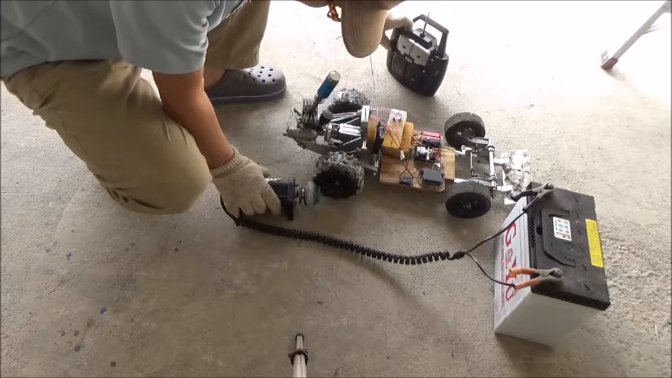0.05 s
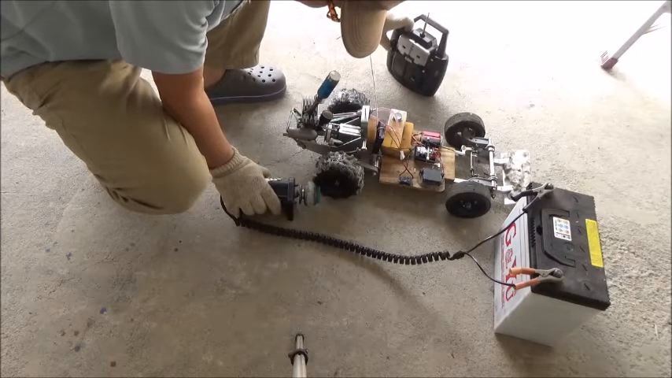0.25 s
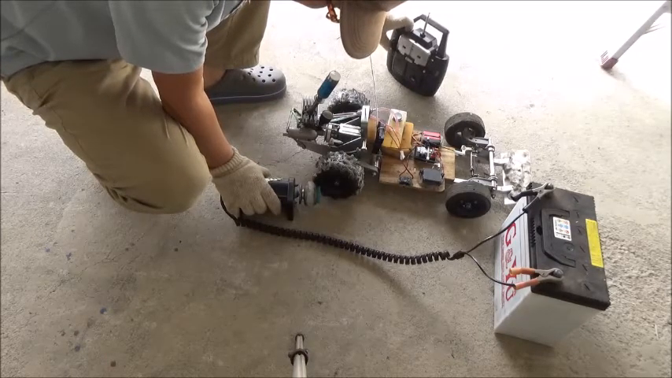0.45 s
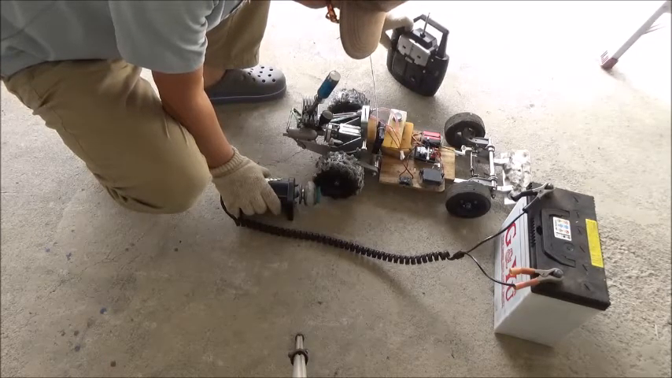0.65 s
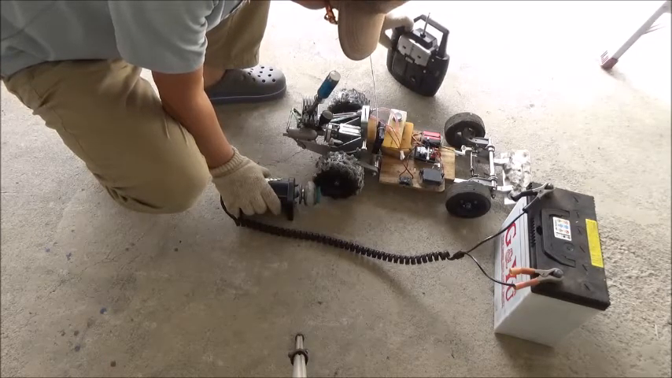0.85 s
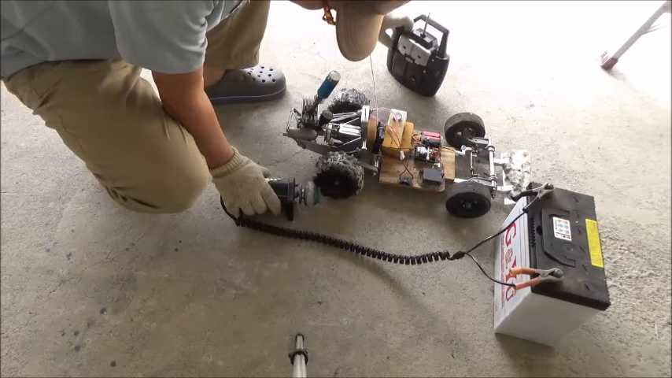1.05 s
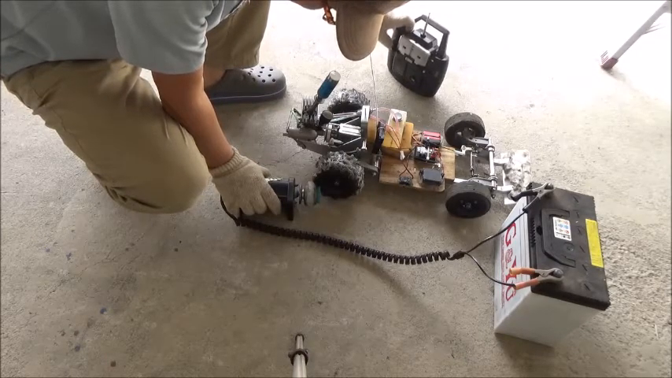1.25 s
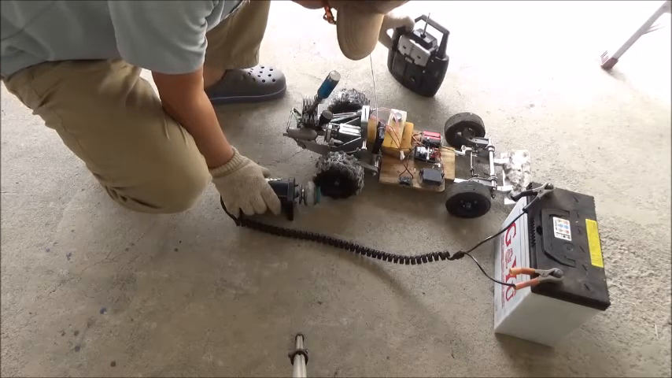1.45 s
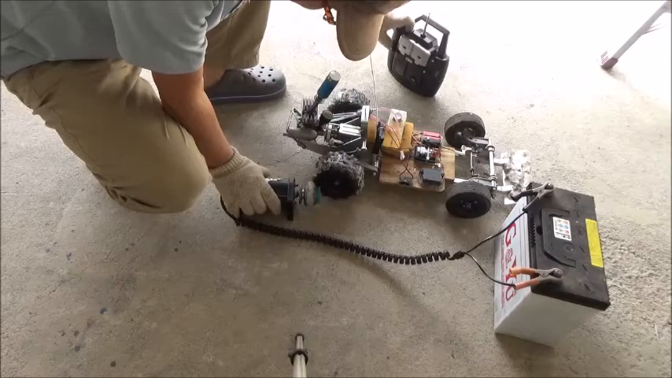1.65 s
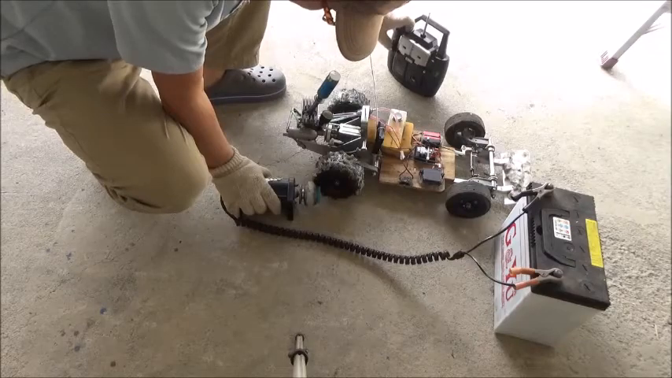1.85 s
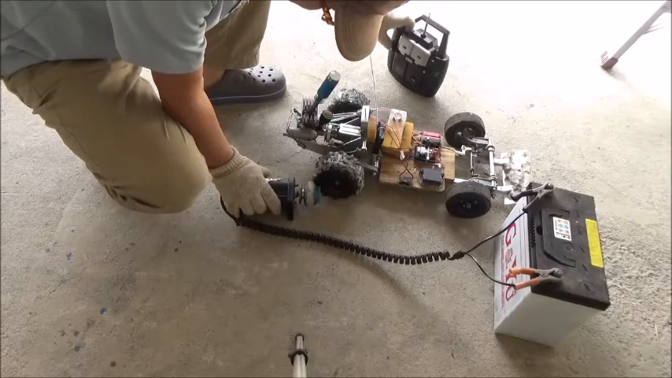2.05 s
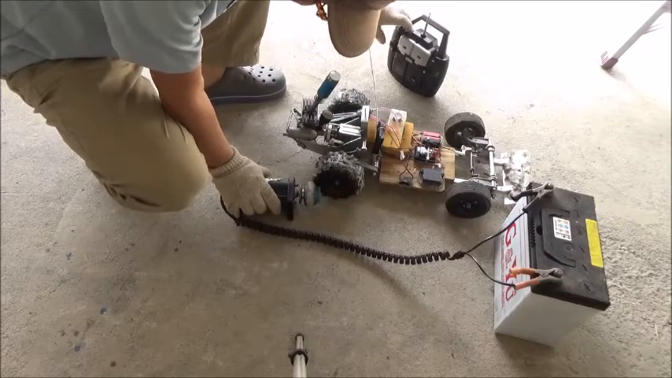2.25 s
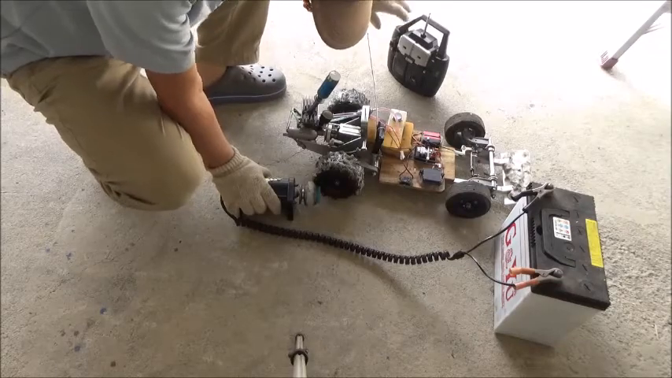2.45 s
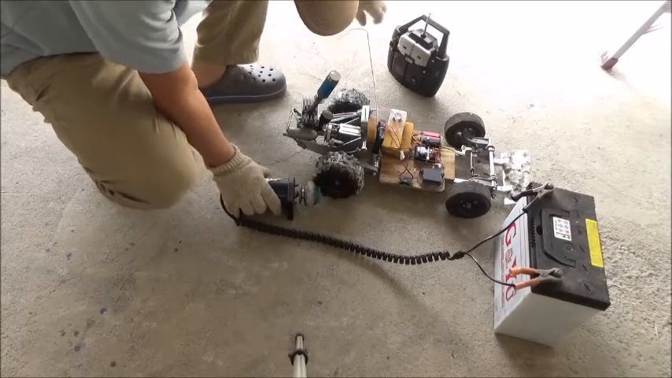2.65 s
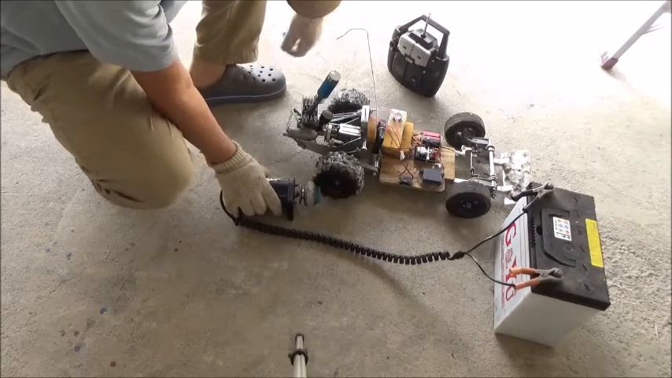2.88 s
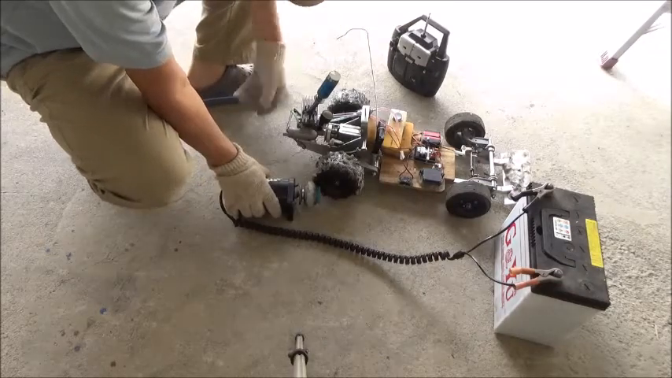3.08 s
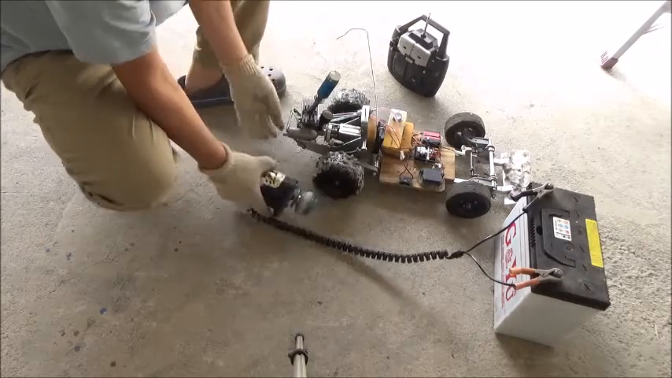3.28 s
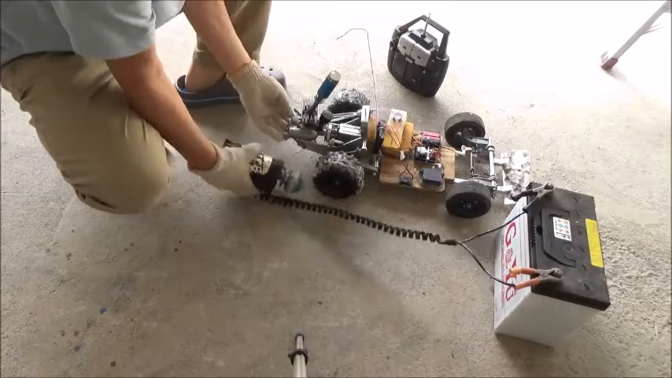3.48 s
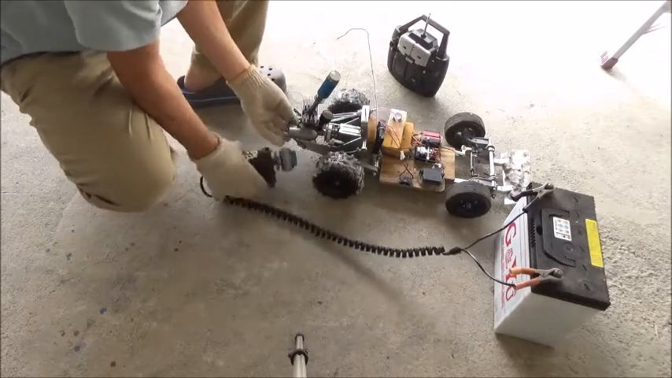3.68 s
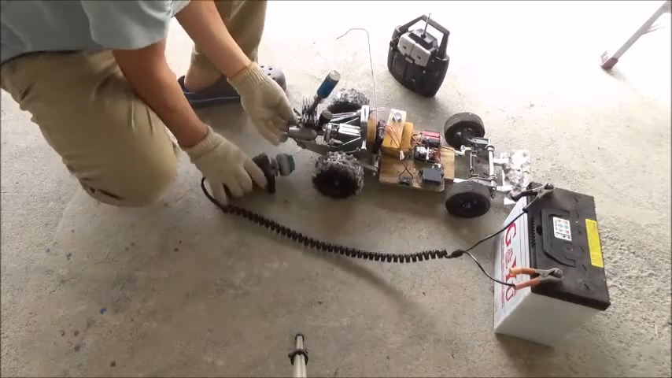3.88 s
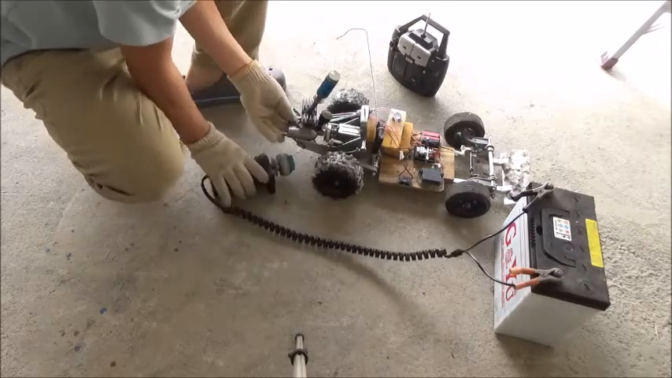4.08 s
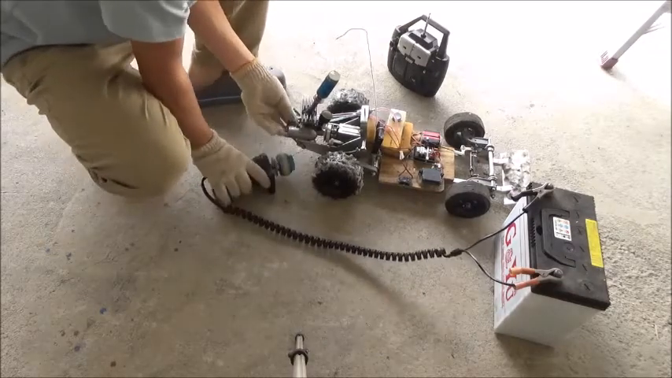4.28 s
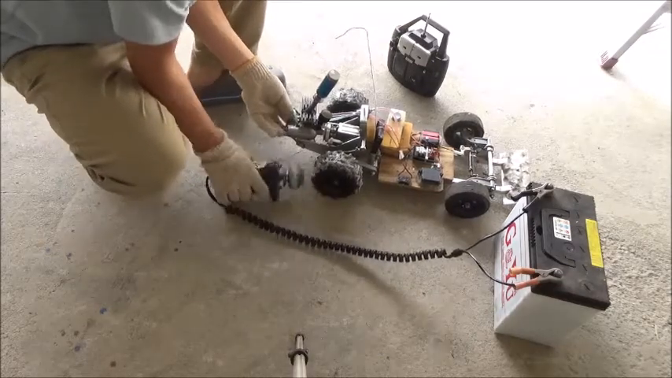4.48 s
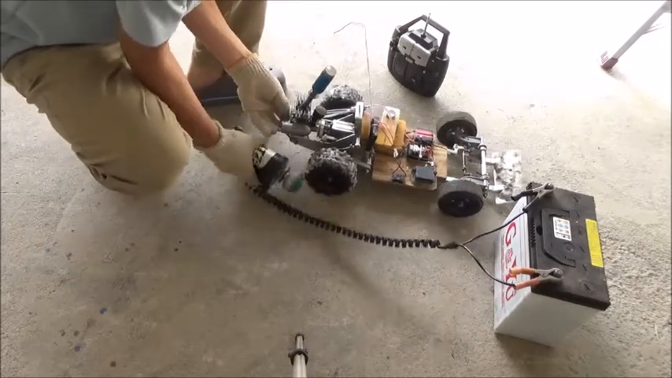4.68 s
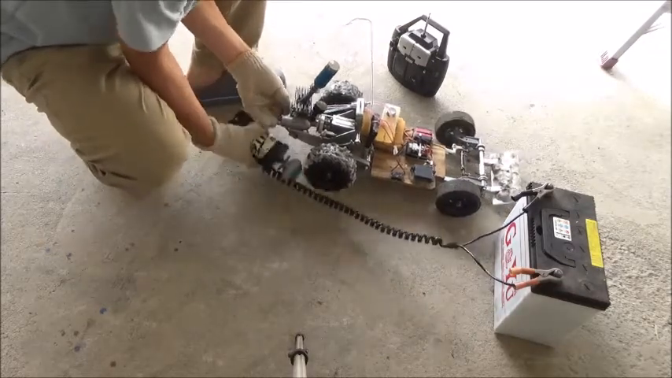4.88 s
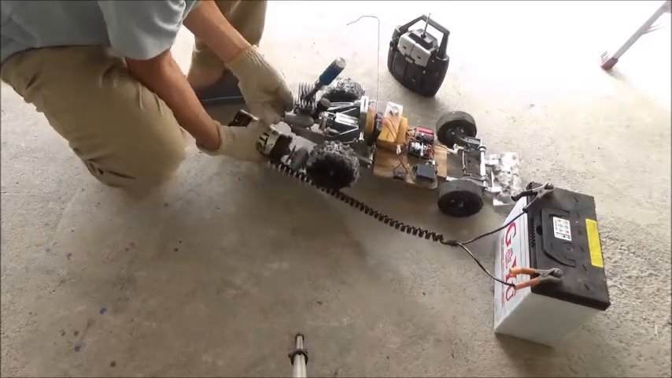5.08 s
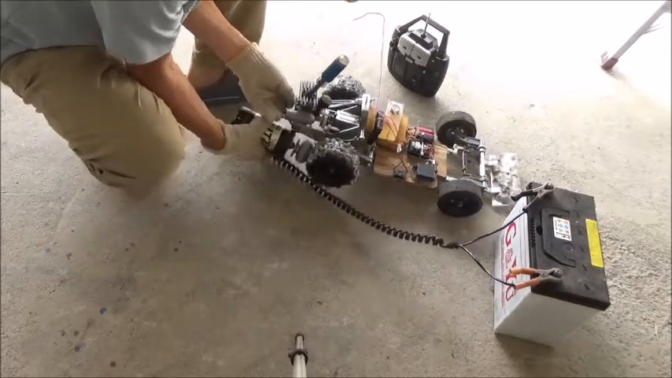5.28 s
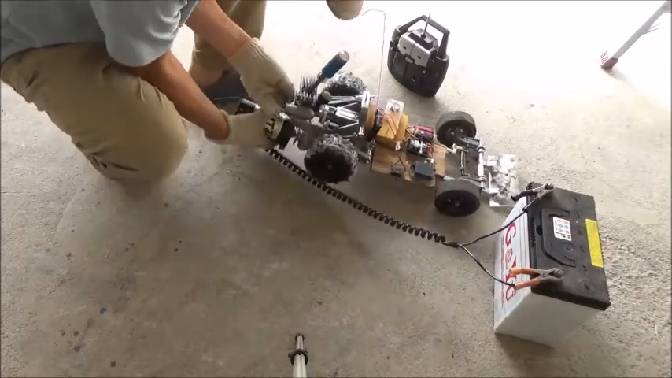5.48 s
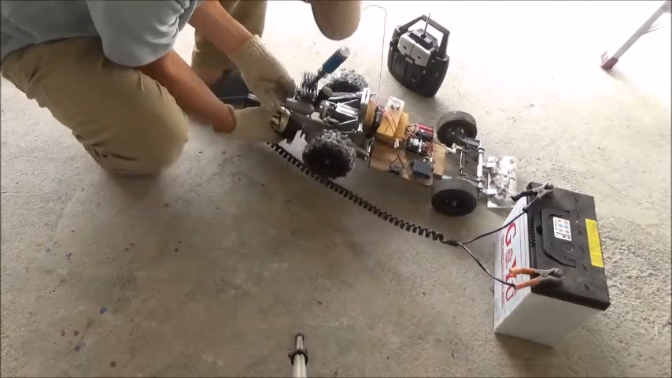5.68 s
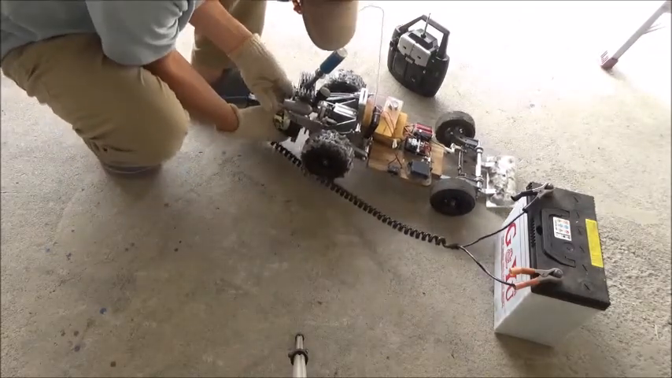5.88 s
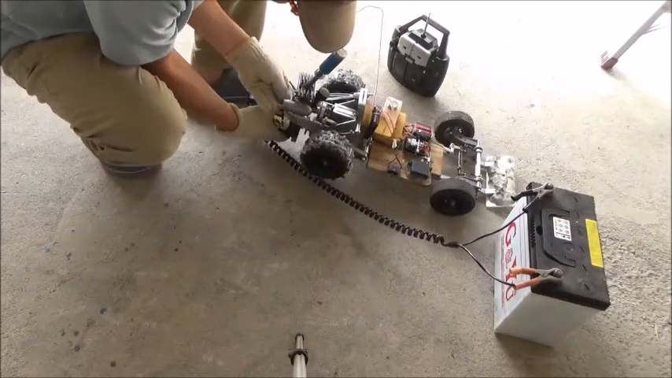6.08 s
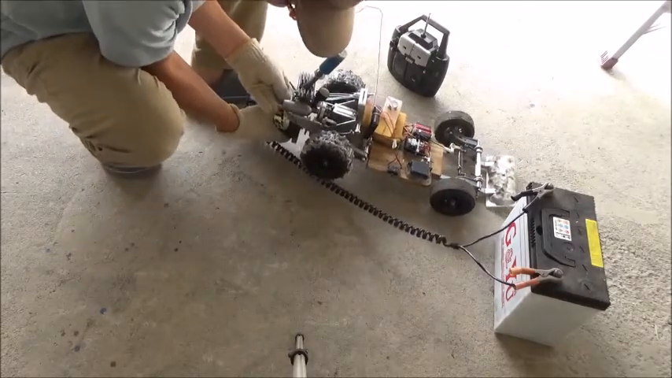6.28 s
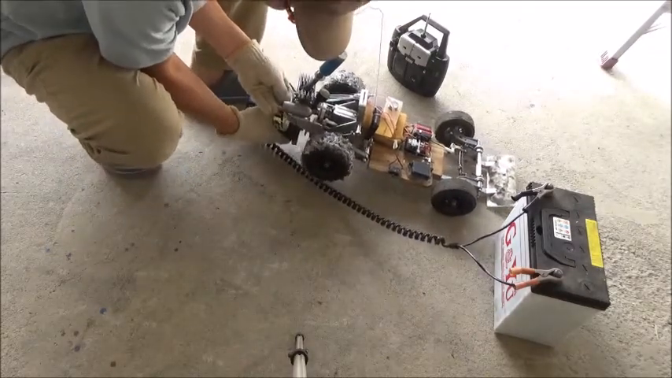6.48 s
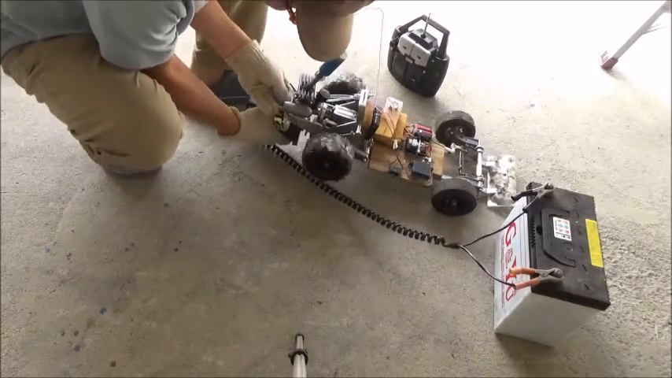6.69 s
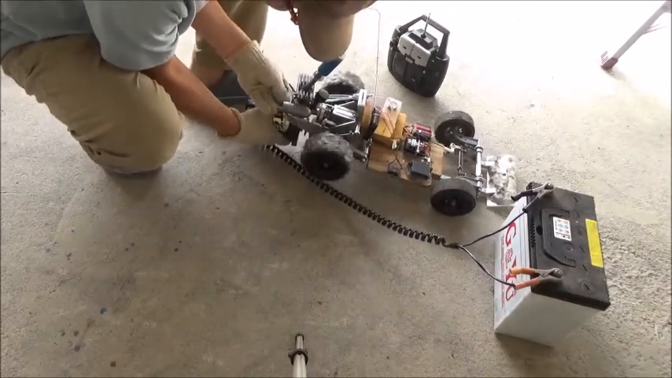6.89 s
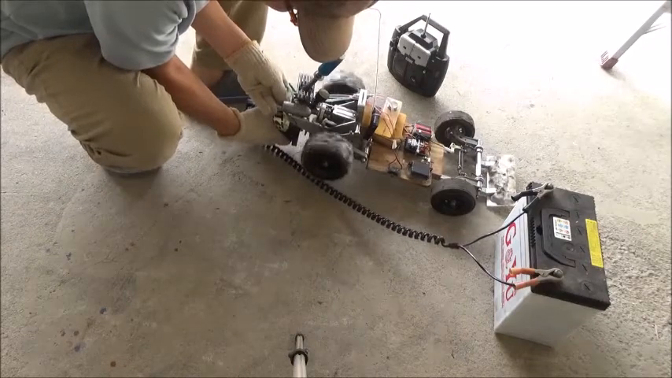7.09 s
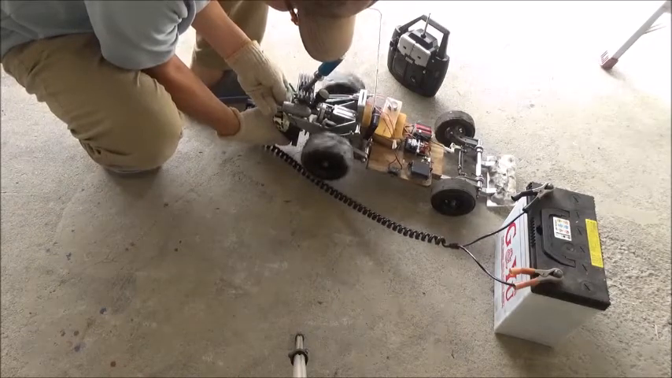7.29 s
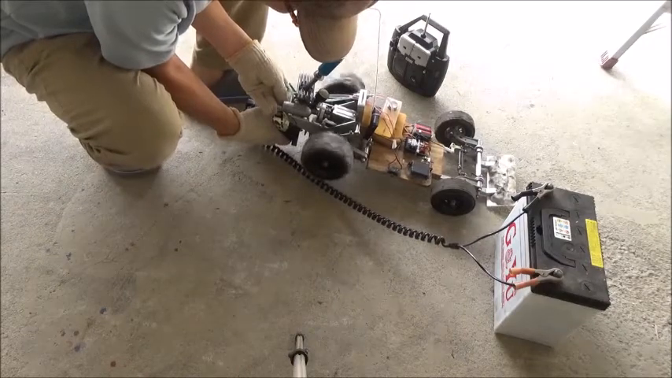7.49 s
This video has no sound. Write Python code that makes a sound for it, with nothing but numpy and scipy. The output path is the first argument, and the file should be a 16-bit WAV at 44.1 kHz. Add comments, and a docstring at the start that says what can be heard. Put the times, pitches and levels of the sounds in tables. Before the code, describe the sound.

Faint cicada chirps and handling knocks give way to a handheld starter's loud whine and rattle as it turns a small engine that never catches.

```python
"""A cicada sings over outdoor hiss, its clicking tymbals buzzing under chirps, whistles and rasps.
Shoes scuff and a hand-held electric starter is knocked about on a concrete floor, its housing ringing.
Near 6 s the starter spins up with a squeak, humming and whining, and is pressed onto a model car's
small engine. Its cone grips the flywheel and the motor sags; the piston puffs, gears grate and loose
metal rattles, but the engine does not fire. A hard-walled room echoes it all."""
import sys
import numpy as np
from scipy import signal
from scipy.fft import rfft, irfft
from scipy.io import wavfile

SR = 44100
rng = np.random.default_rng(int(sys.argv[2]) if len(sys.argv) > 2 else 0)


def wav_record(signal):
    """Record a signal, one row per channel, as 16-bit PCM in the file named by sys.argv[1]."""
    frames = np.transpose(np.atleast_2d(signal))
    bounded = np.clip(frames, -1, 1)
    # unit amplitude maps onto the largest positive 16-bit level
    quanta = np.round(bounded * 32767).astype(np.int16)
    wavfile.write(sys.argv[1], SR, quanta)


N = 332514
T = np.arange(N) / SR


def amp(db):
    """Decibels to gain."""
    return 10 ** (np.asarray(db) / 20)


def unit(x):
    """Scale to rms 1."""
    return x / np.sqrt(np.mean(x ** 2) + 1e-20)


def noise():
    """White noise for the whole scene."""
    return rng.standard_normal(N)


def wander(hz):
    """Smooth random drift, rms 1, rolling off above hz."""
    return unit(irfft(rfft(noise()) * np.exp(-(np.fft.rfftfreq(N, 1 / SR) / hz) ** 2), N))


def ramp(start_s, rise_s):
    """Linear rise from 0 to 1."""
    return np.clip((T - start_s) / rise_s, 0, 1)


def gate(start_s, length_s, rise_s, fall_s):
    """Rise, hold until the length is over, then fall."""
    return ramp(start_s, rise_s) * (1 - ramp(start_s + length_s, fall_s))


def add(mix, start_s, sound):
    """Mix a sound in at start_s."""
    part = mix[round(start_s * SR):][:len(sound)]
    part += sound[:len(part)]


def read(points, hz):
    """Interpolate on a log-frequency axis."""
    point_hz, values = np.transpose(points)
    return np.interp(np.log(hz + 1), np.log(point_hz + 1), values)


def colour(x, spectrum, tilt_db_per_octave=0, size=2048):
    """Minimum-phase filter of unit energy, shaped by the tilted spectrum."""
    hz = abs(np.fft.fftfreq(size, 1 / SR))
    log_gain = np.log(amp(read(spectrum, hz) + tilt_db_per_octave * np.log2((hz + 200) / 2000)))
    taps = np.fft.ifft(np.exp(np.conj(signal.hilbert(log_gain)))).real
    return signal.oaconvolve(x, taps / np.linalg.norm(taps))[:len(x)]


def resonate(x, hz, width_hz):
    """Steep resonance at a fixed or gliding frequency, rms 1."""
    carrier = np.exp(2j * np.pi * np.cumsum(hz * np.ones(len(x))) / SR)
    pole = np.exp(-np.pi * width_hz / SR)
    return unit((carrier * signal.lfilter([1], [1, -2 * pole, pole * pole], x / carrier)).real)


def modal(x, modes):
    """A body's resonances driven by x, rms 1."""
    return unit(sum(amp(db) * signal.lfilter(*signal.iirpeak(hz, hz / width_hz, SR), x)
                    for hz, width_hz, db in modes))


def cycle(turns, orders, scatter_rad, size=1024):
    """One wave per turn: little phase scatter gives a ringing pulse, much gives a whirr."""
    order, db = np.transpose(orders)
    gain = np.full(size // 2 + 1, amp(db.max() - 50))
    gain[np.round(order).astype(int)] = amp(db)
    minimum_phase = -signal.hilbert(np.log(np.r_[gain, gain[-2:0:-1]])).imag[:len(gain)]
    lines = gain * np.exp(1j * (minimum_phase + scatter_rad * rng.standard_normal(len(gain))))
    wave = irfft(lines[:round(order.max()) + 1], size * 2)
    return unit(np.interp(turns, np.arange(len(wave)) / len(wave), wave, period=1))


# Room decay. Each row: frequency in Hz, t60 in seconds.
ROOM_DECAY = [(150, 0.35), (1000, 0.51), (3000, 0.47), (6000, 0.41), (11000, 0.3)]

def echo(x):
    """Diffuse tail of the hard-walled room."""
    t = np.arange(SR // 2) / SR
    reflections = rng.standard_normal(len(t)) * (rng.random(len(t)) < .1) * (t > .004)
    hz, age_s, bands = signal.stft(reflections, SR, nperseg=256)
    tail = signal.istft(bands * amp(-60 * age_s / read(ROOM_DECAY, hz)[:, None]), SR, nperseg=256)[1]
    return signal.fftconvolve(x, tail / np.linalg.norm(tail))[:N]


def place(x, side_db, balance_db):
    """Side reflections spread the sound in stereo; positive balance is left."""
    side = amp(side_db) * echo(x)
    return np.array([(x + side) * amp(balance_db / 2), (x - side) * amp(-balance_db / 2)])


# Outdoor hiss. Each row: frequency in Hz, relative density in dB.
AIR_SPECTRUM = [(20, -17), (70, -29), (115, -19.5), (240, -7.5), (350, -5.5), (800, -0.5), (1150, -8),
                (1900, 3), (3000, -8), (3800, -1), (6900, 0), (9500, -2.5), (11000, -7)]

def background():
    """Steady outdoor hiss with a faint wavering hum."""
    hum = amp(-73.5) * resonate(noise(), 243.7, 20) + amp(-85) * resonate(noise(), 116.2, 24)
    return amp(-46.5) * unit(colour(noise(), AIR_SPECTRUM)) + hum


def glide(length_s, from_hz, to_hz, width_hz, swell=0.38, flutter_db=1.5):
    """A cicada's gliding, wavering band of noise that swells and fades inside a broader skirt."""
    waver_s, waver_share = 0.0298, 0.025
    progress = np.linspace(0, 1, round(length_s * SR))
    core, skirt = rng.standard_normal((2, SR))[:, :len(progress)]
    bend, flutter = [np.interp(progress * length_s / waver_s, np.arange(64), knots)
                     for knots in rng.standard_normal((2, 64))]
    hz = (from_hz + (to_hz - from_hz) * progress ** 0.76) * (1 + waver_share * bend)
    band = resonate(core, hz, width_hz) + amp(1) * resonate(skirt, hz, 2 * width_hz)
    return np.sin(np.pi * progress) ** swell * unit(band * amp(flutter_db * flutter))


def high_note(length_s, chirp_s, chirp_db, whistle_db, rasp_db, undertone_db):
    """A chirp opens into a whistle over a faint undertone; a rasp climbs above and outlasts them."""
    out = np.zeros(SR)
    add(out, 0, amp(chirp_db) * glide(chirp_s, 1280, 2520, width_hz=200))
    add(out, 0, amp(chirp_db - 1.5) * glide(chirp_s, 2560, 5040, width_hz=900))
    whistle, undertone = (0.09, 3606, 500, 280, whistle_db), (0.12, 1795, 630, 230, undertone_db)
    for delay_s, hz, rise_hz_per_s, width_hz, db in (whistle, undertone):
        held_s = length_s - delay_s
        add(out, delay_s, amp(db) * glide(held_s, hz, hz + rise_hz_per_s * held_s, width_hz))
    rasp_s, rasp_hz = length_s + 0.003, 6830
    top_hz = min(rasp_hz + 7500 * rasp_s, 9560)
    rasp = glide(rasp_s, rasp_hz, top_hz, width_hz=1600, swell=0.7, flutter_db=.4)
    add(out, .02, amp(rasp_db) * rasp)
    return out


SLIDE_S = 0.046  # lead-in of a low note

def low_note(clicks, start_s, length_s, from_hz, tone_db, flick_db):
    """Clicks sound the abdomen's resonance, which slides into place, creeps up and flicks away."""
    pitch_hz, rise_hz_per_s, width_hz, settle_s = 1574, 500, 230, 0.0333
    t = np.arange(SR) / SR
    end_s = SLIDE_S + length_s
    slide_hz = (from_hz - pitch_hz) * np.exp(-(t / settle_s) ** 2)
    hz = pitch_hz + rise_hz_per_s * (t - SLIDE_S) + slide_hz
    drive = clicks[round(start_s * SR):][:SR]
    tone = resonate(drive, hz, width_hz) + amp(-3) * resonate(drive, 1.93 * hz, width_hz=555)
    out = amp(tone_db) * tone * np.clip(t / .012, 0, 1) * np.clip(1 - (t - end_s) / .03, 0, 1)
    flick = glide(0.29, 9600, 10400, width_hz=1500, swell=.9, flutter_db=1.3)
    lift = glide(0.15, pitch_hz + rise_hz_per_s * length_s, 2500, width_hz)
    add(out, end_s, amp(flick_db) * flick)
    add(out, end_s, amp(flick_db - 4) * lift)
    return out


# Chirp runs leading into a phrase. Each row: start and length in seconds, level in dB.
CHIRP_RUNS = [(0.084, .14, -57), (1.053, .14, -57), (1.686, .32, -52), (2.878, .14, -54.5),
              (5.05, .14, -58)]
# High notes. Each row: start, length and chirp length in seconds;
# chirp, whistle, rasp and undertone levels in dB.
HIGH_NOTES = [(0.435, 0.47, 0.084, -46.5, -53, -60, -72), (0.701, 0.52, 0.23, -52.5, -50, -58, -53.5),
              (1.214, 0.3, 0.11, -49, -52.5, -46, -70), (2.032, 0.24, 0.085, -47, -45, -44, -78),
              (3.056, 0.32, .06, -50, -45.5, -43.5, -49.5), (4.103, 0.38, 0.12, -45.5, -46, -45.5, -65),
              (5.223, .37, .09, -51.5, -48, -47, -54)]
# Low notes. Each row: start and length in seconds, nominal opening pitch in Hz;
# tone, buzz and closing flick levels in dB.
LOW_NOTES = [(0.383, .085, 1300, -52, -60, -54), (2.268, .292, 3470, -46.5, -44.5, -48.5),
             (3.381, .285, 2370, -49, -44, -48), (4.456, .31, 2010, -48.5, -44.5, -49),
             (5.589, 0.28, 2170, -47, -45.5, -53)]
# Tymbal buzz. Each row: frequency in Hz, relative density in dB.
TYMBAL_SPECTRUM = [(1200, -56), (2200, 1.5), (3000, -2), (4000, 0), (5300, 1.5), (6300, 2), (6900, 2.5),
                   (7800, -5), (11000, -21)]
# Reflections on the cicada's path. Each row: delay in seconds, linear gain.
WALL_REFLECTIONS = [(.0019, 0.23), (.0031, -0.23), (.0054, .3), (.0087, 0.21)]

def cicada():
    """Rapid tymbal clicks buzz without rest and swell around the notes of each phrase."""
    click_hz, chirp_every_s, idle_db = 190, 0.085, -53
    beats = np.cumsum(click_hz * (1 + .08 * wander(9.8))) / SR
    clicks = noise() * unit(1.1 + np.exp(-(beats % 1) / 0.16))
    song, buzz_level = np.zeros(N), np.full(N, amp(idle_db))
    for start_s, length_s, db in CHIRP_RUNS:
        for delay_s in np.arange(0, length_s, chirp_every_s):
            add(song, start_s + delay_s, amp(db) * glide(0.052, 1260, 2690, width_hz=250))
    for start_s, *note in HIGH_NOTES:
        add(song, start_s, high_note(*note))
        swell = gate(start_s - 0.13, 0.26, rise_s=0.042, fall_s=0.12)
        buzz_level = np.hypot(buzz_level, amp(-49.5) * swell)
    for start_s, length_s, from_hz, tone_db, buzz_db, flick_db in LOW_NOTES:
        add(song, start_s - SLIDE_S, low_note(clicks, start_s, length_s, from_hz, tone_db, flick_db))
        swell = gate(start_s - SLIDE_S, length_s + SLIDE_S, rise_s=0.042, fall_s=0.12)
        buzz_level = np.hypot(buzz_level, amp(buzz_db) * swell)
    direct = song + colour(buzz_level * clicks, TYMBAL_SPECTRUM)
    out = direct.copy()
    for delay_s, gain in WALL_REFLECTIONS:
        add(out, delay_s, gain * direct)
    return out


# Shoe and tyre scuffs. Each row: start in seconds, level in dB, rise and t60 in seconds.
SCUFFS = [(1.289, -54, 0.03, 0.84), (2.524, -36, 0.0078, 0.67), (2.62, -49, 0.0075, 0.27),
          (3.384, -42.5, 0.023, 0.21), (3.422, -42.5, 0.024, 0.88), (5.16, -61, 0.0048, .2),
          (6.34, -39, 0.0081, 0.89), (6.68, -47, 0.035, 0.33)]
# Rubber friction. Each row: frequency in Hz, relative density in dB.
SCUFF_SPECTRUM = [(30, -47), (70, -32), (145, -33), (205, 10), (300, 13), (380, 7), (490, 8.5), (600, -5),
                  (1000, -5), (2000, -73)]

def scuffs():
    """Rubber shifts on concrete in short, dull rubs."""
    level = np.zeros(N)
    for start_s, db, rise_s, t60_s in SCUFFS:
        decay_db = 60 * np.maximum(T - start_s - rise_s, 0) / t60_s
        level += amp(db - decay_db) * ramp(start_s, rise_s)
    return colour(level * noise(), SCUFF_SPECTRUM)


# Blows on floor and chassis. Each row: start in seconds, relative level in dB,
# tilt in dB per octave, chatter t60 in seconds, chassis share in dB.
KNOCKS = [(0.523, -32, 3.5, 0.039, -7.5), (1.1, -48, 7, 0.018, -25), (3.679, -24, -1.5, 0.076, -12.5),
          (3.704, -28.5, -5, 0.026, -10), (3.794, -10.5, -3, 0.043, -16), (3.813, -25, -3.5, 0.12, -18),
          (3.843, -15, 2.5, 0.053, -9.5), (4.081, -39, 5, .025, -13), (4.406, -36.5, 1, 0.095, -10),
          (4.414, -25.5, 10, 0.14, -32), (4.46, -33, -1, 0.17, -24), (5.16, -33, 2.5, 0.05, 5),
          (5.447, -39, 10, 0.025, -16), (5.66, -48.5, 6, 0.78, 8.5), (5.894, -31.5, 5.5, 0.11, -4.5),
          (6.068, -30.5, 7, 0.065, -11), (6.081, -20, 11, 0.018, -18), (6.102, -27, 8, .03, -28),
          (6.35, -11, 12, 0.061, -9)]
# Contact clack. Each row: frequency in Hz, relative gain in dB.
CLACK_SPECTRUM = [(40, -50), (100, -41), (165, -16), (330, -15), (620, -19), (820, 1), (1080, 3), (1300, 2),
                  (1900, 1), (2500, -4.5), (3000, -3.5), (4000, -15.5), (7000, -20.5), (11000, -42)]
# Starter housing. Each row: frequency and width in Hz, relative gain in dB.
HOUSING_MODES = [(832, 29, 8.5), (1090, 87, 10), (1400, 240, 9), (1850, 380, 8), (2270, 170, 8),
                 (2800, 100, 5), (3300, 220, 2), (4450, 240, -3), (6400, 250, -6), (7200, 170, -17)]
# The car's hollow chassis. Each row: frequency and width in Hz, relative gain in dB.
CHASSIS_MODES = [(183, 26, -6), (435, 94, 3.5), (501.6, 6.8, 13), (681, 17.5, 16.5), (786, 114, 12),
                 (2880, 170, -13)]

def knocks():
    """Each blow clacks and chatters, ringing the starter's housing and the chassis."""
    out, t = np.zeros(N), np.arange(SR // 4) / SR
    contact = (1 - np.exp(-t / 0.00037)) * np.exp(-t / 0.0024)
    low_cut = signal.butter(2, 645, "high", fs=SR)  # the small housing radiates little bass
    for start_s, db, tilt, chatter_s, chassis_db in KNOCKS:
        envelope = contact + 0.36 * amp(-60 * t / chatter_s)
        force, jolt = rng.choice([-1., 1.], (2, len(t))) * envelope
        clack = colour(force, CLACK_SPECTRUM, tilt)
        housing = amp(-6.5 - 2 * tilt) * modal(signal.lfilter(*low_cut, jolt), HOUSING_MODES)
        chassis = amp(chassis_db) * modal(force, CHASSIS_MODES)
        add(out, start_s, amp(db - 3) * (clack + force.std() * (housing + chassis)))
    return out + amp(-5.5) * echo(out)


# Glove and coiled cable on the floor. Each row: start and length in seconds, level in dB.
DRAGS = [(3.084, 0.16, -52), (3.38, 0.24, -51), (3.666, 0.21, -44.5), (4.39, .06, -47)]

def drags():
    """Uneven friction faintly sounds the starter's housing."""
    level = sum(amp(db) * gate(start_s, length_s, rise_s=0.036, fall_s=.07)
                for start_s, length_s, db in DRAGS)
    unevenness = amp(2 * wander(40))
    friction = colour(noise(), CLACK_SPECTRUM, tilt_db_per_octave=-0.54)
    return level * unevenness * modal(friction, HOUSING_MODES)


def shaft_squeak(start_s=6.11, length_s=0.052, from_hz=1420, to_hz=1600):
    """The starter's shaft squeals briefly as it begins to turn."""
    progress = ramp(start_s, length_s)
    hz = (from_hz + (to_hz - from_hz) * progress) * (1 + .03 * wander(300))
    phase = 2 * np.pi * np.cumsum(hz) / SR
    return amp(-44) * np.sin(np.pi * progress) * (np.sin(phase) + 2 * np.sin(2 * phase))


def gear_mesh(turns, spectrum, lowest_order, nominal_turns_per_s=96.4):
    """Gear teeth grate in the same uneven way on every turn."""
    orders = np.arange(lowest_order, 120)
    db = read(spectrum, orders * nominal_turns_per_s) + 3 * rng.standard_normal(len(orders))
    return cycle(turns, np.c_[orders, db], scatter_rad=np.pi)


# Engine and frame. Each row: frequency and width in Hz, relative gain in dB.
METAL_MODES = [(2763, 46.5, 8.5), (3080, 200, 6.5), (4330, 120, -14), (5070, 490, -8), (6300, 1250, -2),
               (8050, 64, -8), (8220, 290, 0.5), (9360, 510, -4.5), (10600, 170, -4)]

def rattle(stroke, slaps_per_s=600, grate_s=0.00076):
    """Loose metal slaps at random, hardest on the stroke; each slap grates for a moment."""
    slaps = (rng.random(N) < slaps_per_s / SR) * rng.uniform(.6, 1.2, N)
    chatter = np.tanh(signal.lfilter([1], [1, -np.exp(-1 / (grate_s * SR))], slaps))
    return modal(chatter * stroke * noise(), METAL_MODES)


ENGAGE_S = 6.34  # cone meets flywheel
# Piston puff. Each row: multiple of engine speed, relative level in dB.
PUFF_ORDERS = [(1, -32), (2, -28), (3, -21), (4, -8), (5, -10), (6, -6.5), (7, -11.5), (8, 3.5), (9, 6),
               (10, -1), (11, -1.5), (12, -1.5), (13, 0.5), (14, 0), (15, -6), (16, -11), (17, -17),
               (18, -3), (19, -10.5), (20, -5.5), (21, -7), (22, -22), (23, -14), (24, -47), (25, -5.5),
               (26, -5), (27, -24), (28, 0.5), (29, 3.5), (30, -22), (31, 2), (32, 1.5), (33, -13),
               (34, -1), (35, -7)]
# Engine air and gear noise. Each row: frequency in Hz, relative density in dB.
CHURN_SPECTRUM = [(30, -33), (120, -36), (300, -24.5), (560, -15), (850, -7.5), (1300, 3), (2300, 0.5),
                  (3000, 7.5), (4400, -4), (5400, -4), (6400, 1.5), (7200, -3.5), (9500, 0), (11000, -19.5)]

def engine(turns):
    """One piston puff a turn, with grating gears, rushing air, rattle and a shuddering chassis."""
    level = amp(-4) * ramp(ENGAGE_S, rise_s=0.092)
    shaken_turns = turns + .0012 * wander(50)
    puffs = amp(-21.3) * cycle(shaken_turns, PUFF_ORDERS, scatter_rad=.15) * amp(wander(60))
    puffs *= amp(3 * gate(7.0, 0.31, rise_s=0.087, fall_s=0.087))  # briefly more prominent
    gears = amp(-26) * gear_mesh(shaken_turns, CHURN_SPECTRUM, lowest_order=36)
    stroke = unit(0.29 + np.exp(-(turns % 1) / 0.066))  # air rushes and parts shake as the port opens
    air = amp(-20.5) * colour(noise() * stroke, CHURN_SPECTRUM)
    metal = amp(-21) * rattle(stroke)
    shaking = colour(noise() * stroke, CHURN_SPECTRUM, tilt_db_per_octave=-8.5)
    shudder = amp(-31.5) * modal(shaking, CHASSIS_MODES)
    return level * (puffs + gears + air + metal + shudder)


def motor_level(nudge_s=6.06, switch_on_s=6.155, fade_db_per_s=64):
    """A brief nudge, then an inrush surge at switch-on that settles to a steady run."""
    fade_db = fade_db_per_s * np.maximum(T - nudge_s, 0)
    nudge = ramp(nudge_s, rise_s=0.0033) * amp(-36.5 - fade_db)
    surge_db = 2 * np.exp(-np.maximum(T - switch_on_s, 0) / 0.026)
    run = ramp(switch_on_s, rise_s=0.036) * amp(-23.5 + surge_db)
    return np.maximum(nudge, run)


# Motor hum. Each row: multiple of shaft speed, relative level in dB.
MOTOR_ORDERS = [(1, -46), (2, -23), (3, -22.5), (4, -20), (5, -14.5), (6, -11.5), (7, -1.5), (8, 6),
                (9, -2.5), (10, -4), (11, -1.5), (12, -5), (13, -10), (14, -2), (15, 1.5), (16, -4.5),
                (17, -19), (18, 3), (19, -3), (20, -3), (21, -1)]
# Starter gear and brush noise. Each row: frequency in Hz, relative density in dB.
STARTER_SPECTRUM = [(100, -59), (400, -19.5), (750, -9.5), (1700, -4), (2700, -6), (3350, -3), (4200, -8),
                    (5600, -4), (6000, -14), (6400, -4), (9200, -6), (10250, -5), (11000, -0.5)]

def starter(turns):
    """The motor hums, its gears grate and its brushes hiss under a high whine."""
    hum = amp(-10) * cycle(turns, MOTOR_ORDERS, scatter_rad=np.pi)
    gears = amp(-7) * gear_mesh(turns + 0.0051 * wander(110), STARTER_SPECTRUM, lowest_order=25)
    sparks = noise() * (1 + 0.17 * np.cos(2 * np.pi * turns))
    hiss = amp(2.5) * colour(sparks, STARTER_SPECTRUM)
    whine = amp(-13) * resonate(sparks, 5980, 280) + amp(-14) * resonate(sparks, 10300, 800)
    return motor_level() * (hum + gears + hiss + whine)


# Drive speed before sag and slip. Each row: time in seconds, turns per second.
BASE_SPEED = [(6.17, 92.4), (6.25, 90.4), (6.314, 91.8), (6.41, 88.9), (6.448, 94.9), (6.498, 93.9),
              (6.532, 96.3), (6.764, 95.2), (6.806, 92.5), (6.898, 95.9), (7.012, 94.7), (7.082, 96.1),
              (7.382, 95.8), (7.54, 96.4)]
# Cone grip. Each row: time in seconds, engine's share of the base speed.
CONE_GRIP = [(6.34, .4), (6.385, .58), (6.415, .85), (6.44, 1)]

def cranking(loaded_share=.871, sag_s=.07):
    """The starter spins free, then sags as its cone slips, grips and drags the engine round."""
    turns_per_s = np.interp(T, *np.transpose(BASE_SPEED))
    grip = np.interp(T, *np.transpose(CONE_GRIP))
    sag = 1 - (1 - loaded_share) * ramp(ENGAGE_S, sag_s)
    starter_turns = np.cumsum(turns_per_s * sag) / SR
    engine_turns = np.cumsum(turns_per_s * grip) / SR
    return starter(starter_turns) + engine(engine_turns) + shaft_squeak()


def scene():
    """Machine, handling noises and outdoor sounds in stereo."""
    machine = place(cranking(), side_db=-12.5, balance_db=-0.9)
    handling = place(knocks() + drags(), side_db=-15, balance_db=0.6)
    rubber = place(scuffs(), side_db=-22.5, balance_db=0.5)
    outdoors = place(cicada() + background(), side_db=-9.5, balance_db=-0.9)
    return machine + handling + rubber + outdoors


def record(dry):
    """Steep low-pass band limit."""
    cutoff_hz = 11020
    taps = signal.firwin(2047, cutoff_hz, window=("kaiser", 9), fs=SR)
    return signal.oaconvolve(dry, taps[None], "same")


dry = scene()
out = record(dry)
wav_record(out)
```